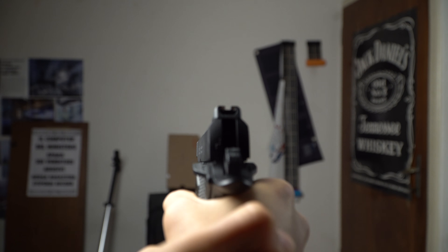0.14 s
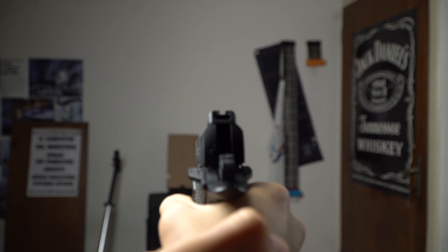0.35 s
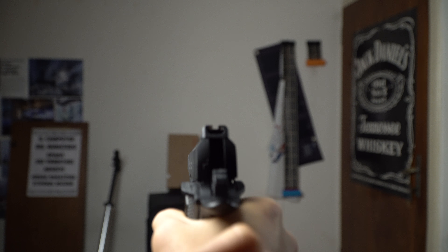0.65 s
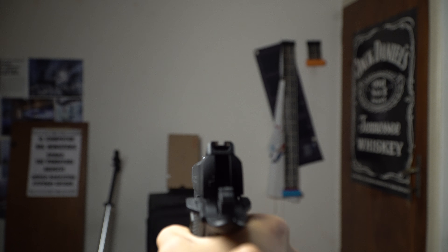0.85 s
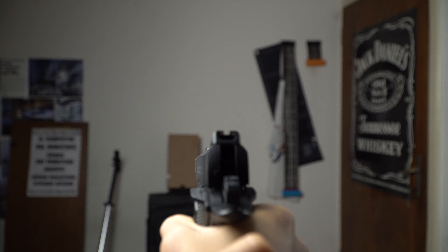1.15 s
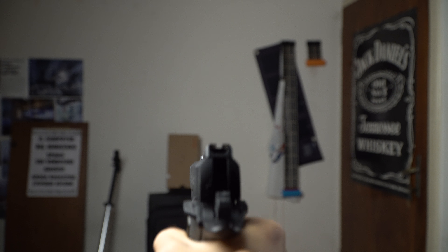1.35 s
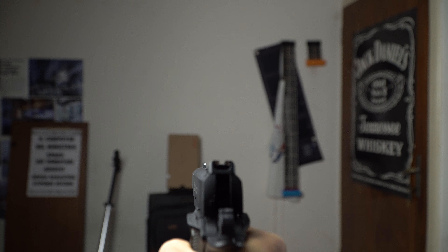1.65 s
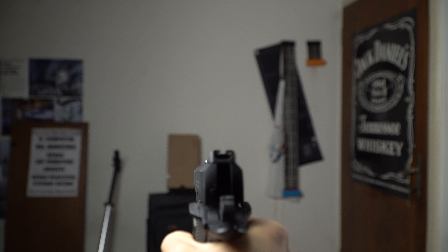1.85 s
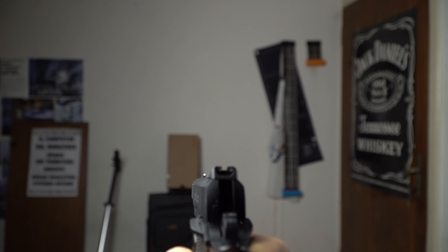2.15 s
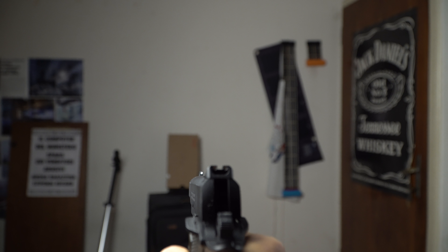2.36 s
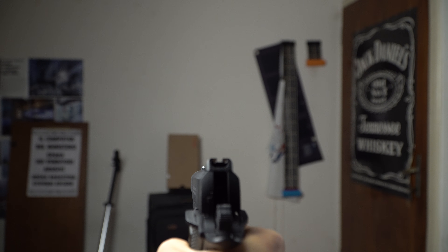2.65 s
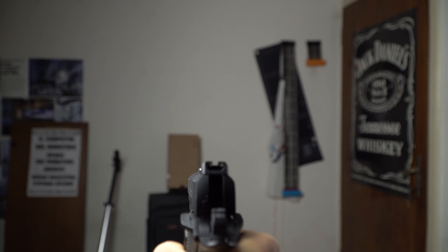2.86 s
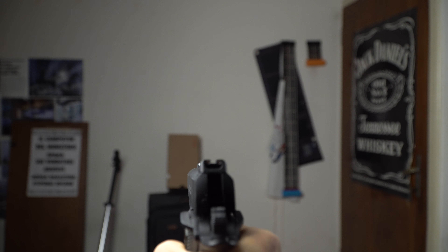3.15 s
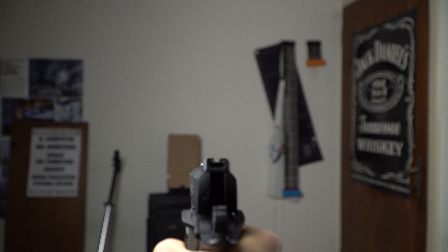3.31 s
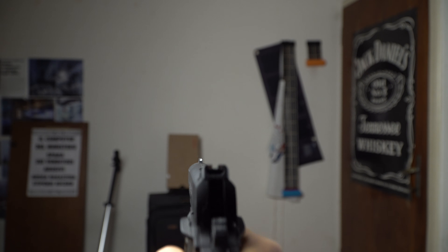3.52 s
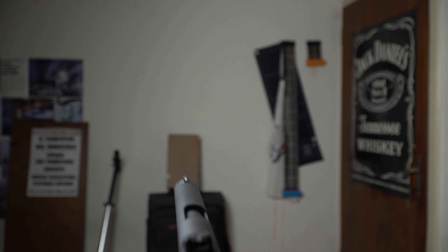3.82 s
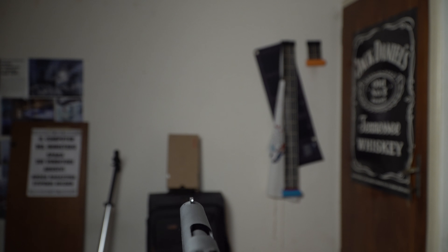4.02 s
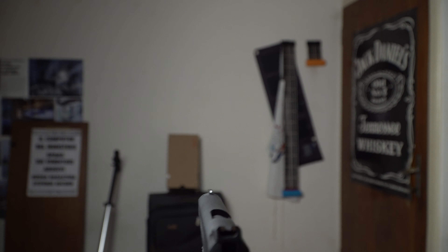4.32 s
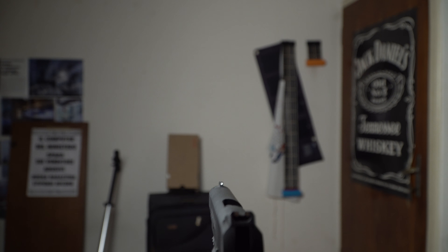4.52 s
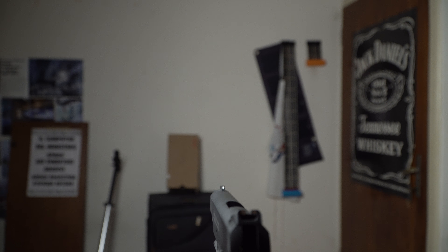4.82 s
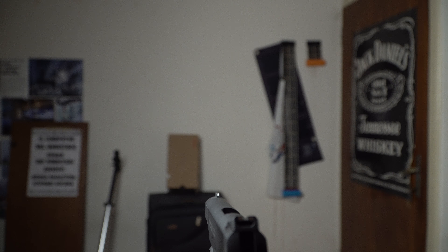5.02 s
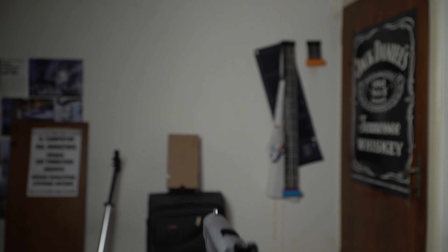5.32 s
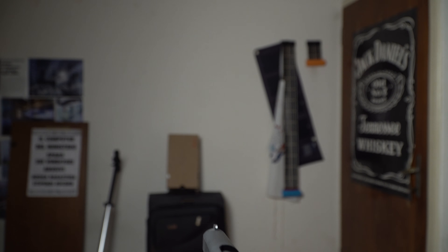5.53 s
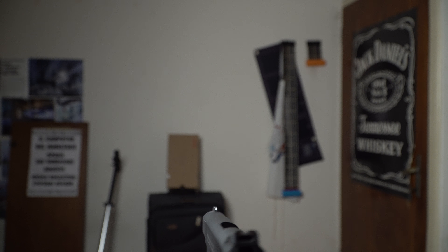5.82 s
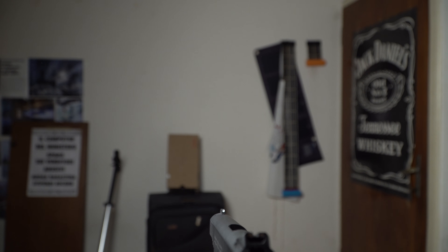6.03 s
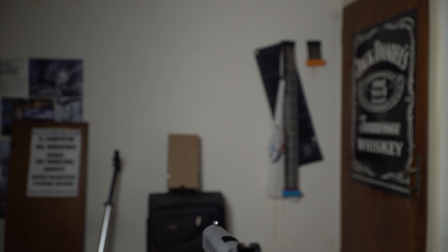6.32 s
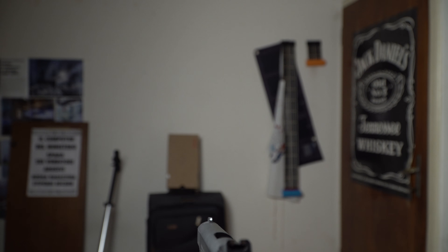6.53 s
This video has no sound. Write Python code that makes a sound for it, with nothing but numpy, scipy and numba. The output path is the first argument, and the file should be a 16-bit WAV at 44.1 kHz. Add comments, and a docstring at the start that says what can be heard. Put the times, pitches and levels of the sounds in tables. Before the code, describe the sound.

Faint hiss and low rumble fill a small bare room. At about 1.9 seconds a gas airsoft pistol fires close to the microphone: a loud, slightly clipped crack with a puff of gas and a metallic slide clack, ringing briefly in the room. A plastic pellet ricochets twice, then bounces to rest in quickening, fading ticks from 2.4 to 2.9 seconds. A second shot comes at 3.1 seconds, followed by three ricochet ticks. From 3.7 seconds the gun ticks faintly and a hand rubs softly on the microphone, ending in a dull bump and a tiny, faint falling finger squeak around 4.7 seconds. A light click at 5.4 seconds and a faint trigger click precede the third shot at 5.8 seconds, with one sharp ricochet and a weaker one. From 6.2 seconds a sleeve rustles softly, and the gun clicks twice around 6.4 seconds.

```python
"""A gas blowback airsoft pistol is fired three times close to a camera in a small bare room.
Over faint hiss a sleeve rustles and the trigger clicks. Each shot is a quick chain: hammer, gas blast,
slide back, gas vent, slide home. A limiter lets the first crack clip, then holds the reverberation level.
Pellets ricochet, the first bouncing to rest. After the second shot the gun ticks, a hand rubs and bumps
the camera and a finger squeaks on the grip; after the third the sleeve rustles and the gun clicks again."""
import sys
import numpy as np
from scipy import signal
from scipy.fft import rfft, irfft
from scipy.io import wavfile
from scipy.ndimage import uniform_filter1d
from numba import njit

SR = 44100
rng = np.random.default_rng(int(sys.argv[2]) if len(sys.argv) > 2 else 0)


def wrap_up_sound(samples):
    """Save the sound to the file named by the first command line argument, as 16-bit audio."""
    columns = np.atleast_2d(samples).T
    # keep every value between -1 and 1, then stretch to whole-number steps
    tamed = np.clip(columns, -1, 1)
    steps = np.round(tamed * 32767).astype(np.int16)
    wavfile.write(sys.argv[1], SR, steps)


N = 294110

# Noise spectra. Each row: frequency in Hz, relative spectral density in dB.
HISS_SPECTRUM = [(25, 13), (70, 11), (130, 7), (330, 1.5), (750, -1), (1150, -1.5), (1500, 1), (1750, -2),
                 (2000, -10), (2800, -14), (5500, -20), (8500, -22), (16000, -24)]  # room and microphone noise
SWAY_SPECTRUM = [(3, -23.5), (9, -5.5), (16, 10.5), (20, -6.5), (26, -21), (45, -36), (100, -68.5)]  # rumble of the hand-held camera
CLOTH_SPECTRUM = [(47, -24), (80, -5), (188, -3.5), (600, -13), (1080, -15.5), (1500, -23), (1720, -17.5),
                  (3030, -18), (4120, -16.5), (5720, -20.5), (8490, -40), (11300, -32), (15000, -47)]  # sleeve friction
CLICK_SPECTRUM = [(300, -26.5), (1200, 1), (2100, 5.5), (4200, 0.5), (8000, -10.5), (16000, -27)]  # small gun parts
BLAST_SPECTRUM = [(30, -25.5), (70, -15.5), (130, -8), (350, -1), (1000, -1.5), (2000, -1), (4500, 0.5),
                  (8000, -12), (12000, -12), (16000, -23.5)]  # blows and gas puffs of a shot
PELLET_SPECTRUM = [(60, -55), (300, -4), (1000, -7), (2500, 2), (4000, 1), (6000, -0.5), (8000, -10),
                   (12000, -10.5), (16000, -21.5)]  # plastic on a hard surface
RUB_SPECTRUM = [(40, -11.5), (200, 1.5), (500, -6.5), (1000, -9.5), (2000, -21), (3800, -19), (7000, -37),
                (16000, -75.5)]  # hand sliding on the camera
BUMP_SPECTRUM = [(30, -4), (70, -18), (230, 0.5), (500, -9), (1200, -23.5), (2600, -20.5), (3500, -33),
                 (5000, -60), (16000, -86)]  # hand striking the camera
# Mains hum and camera whine. Each row: frequency in Hz, rms level in dB.
HUM_TONES = [(50, -58), (1446, -70)]
# Arm movements. Each row: start, attack, hold and release in seconds, level in dB.
SLEEVE_MOVES = [(0.713, 0.018, 0.022, 0.22, -54.5), (6.205, 0.2, .02, 0.44, -41)]
# The room's decay. Each row: frequency in Hz, reverberation time T60 in seconds.
REVERB_TIMES = [(100, 1), (400, 0.59), (1200, 0.56), (3000, 0.52), (6000, 0.46), (10000, 0.36),
                (16000, 0.16)]
# The room's colour. Each row: frequency in Hz, gain in dB.
ROOM_GAINS = [(40, -15), (150, -22), (300, -4.5), (1000, 2.5), (2000, -1.5), (5000, -5.5), (8000, -2),
              (15000, -11)]
# Trigger pulls. Each row: shot time in seconds, shot gain in dB, relative slide ring and furniture ring
# in dB, lead of the trigger click in seconds, its level in dB.
SHOTS = [(1.8503, -5.5, -1, -2.5, .0742, -52.5), (3.1208, -5.5, -4, -1, .0384, -40.5),
         (5.8288, -6, 2, -2, .1029, -41)]
# One shot: sear, hammer, valve, muzzle blast, slide thrown back, slide stop, breech vent, slide home,
# barrel lock. Each row: delay in seconds, relative level in dB, T60 in seconds, tilt in dB per octave,
# relative steel ring in dB.
FIRING_CYCLE = [(-.0027, -4.5, 0.017, 3, -26.5), (0, -1.5, .02, 10, -16.5), (.0012, 12.5, 0.017, 9, -18),
                (.0028, 16, 0.037, 0, -30.5), (0.0107, 16, 0.046, .5, -24), (.016, 13.5, 0.08, 3.5, -29),
                (.037, 13, 0.092, -1.09, -30.5), (.0497, 17, 0.021, 5, -6), (.056, 15, 0.021, 2.5, -4.5)]
# Normal modes. Each row: frequency in Hz, relative level in dB, T60 in seconds.
SLIDE_MODES = [(2810, -8.5, .1), (4450, -3, 0.05), (6086, -4.5, 0.11), (6200, -4.5, .065),
               (6250, -6.5, 0.05), (9240, -10, 0.07), (9440, -10, 0.065), (11260, -5.5, .045),
               (13000, -13.5, .06), (14210, -18.5, 0.061)]  # the steel slide
FURNITURE_MODES = [(312, -12, .8), (399, -13, .9), (556, -26, 1.2), (627, -9, .65), (694, -21.5, 1.35),
                   (740, -14, .6), (842, -24, 1.4), (856, -6.5, .72), (1039, -26, 1.3), (1140, -7, .65),
                   (1231, -15, .85), (1282, -21, 1.3)]  # the room and the things in it
FLOOR_MODES = [(2290, -3, .2), (2960, -8, .2), (5400, -5, 0.18), (5640, -7, .22), (5940, -6, .2)]  # the floor under a pellet
# Brief contacts. Each row: start in seconds, level in dB, tilt in dB per octave.
RICOCHETS = [(2.054, -16, 9), (2.1906, -11, 3.5), (3.2998, -12.5, 10), (3.3793, -9.5, 2.5),
             (3.4951, -22, 5.5), (6.019, -7, 3.5), (6.2323, -25, 4)]  # pellets on walls and furniture
GUN_CLICKS = [(4.0296, -37.5, -0.5), (5.432, -40, 1.5), (6.384, -31, -1.5), (6.428, -31.5, 1)]  # the gun in the hand
# The hand shifts on the camera. One row: start, attack, hold and release in seconds, level in dB.
HAND_SHIFT = (3.74, .29, .57, .23, -46.8)
# The hand bumps the camera. Each row: start in seconds, level in dB, T60 in seconds, tilt in dB per octave.
CAMERA_BUMPS = [(4.6446, -15.5, 0.036, -2), (4.6469, -18.5, 0.013, 7), (4.6673, -23.5, 0.049, -3.5)]


def amp(db):
    """Amplitude ratio of a level in decibels."""
    return 10 ** (np.asarray(db) / 20)


def unit(x):
    """Normalisation to an rms of 1."""
    return x / np.sqrt(np.mean(x ** 2) + 1e-20)


def along(points, hz):
    """Interpolation of (Hz, value) points on a logarithmic frequency axis."""
    f, v = np.transpose(points)
    return np.interp(np.log(hz + 1), np.log(f), v)


def noise(spectrum, size, tilt_db=0):
    """Spectral shaping of white noise, tilted by tilt_db per octave, at an rms of 1."""
    hz = np.fft.rfftfreq(size, 1 / SR)
    gain = amp(along(spectrum, hz) + tilt_db * np.log2(hz + 1))
    return unit(irfft(rfft(rng.standard_normal(size)) * gain, size))


def fade(t60):
    """One second of exponential damping, 60 dB in t60 seconds."""
    return np.exp(-np.log(1000) * np.arange(SR) / SR / t60)


def onset(rise_s):
    """One second of smooth growth from 0 towards 1."""
    return 1 - np.exp(-(np.arange(SR) / SR / rise_s) ** 2)


def swell(start, attack, hold, release, db):
    """Trapezoidal envelope of one movement."""
    corners = start + np.cumsum([0, attack, hold, release])
    return amp(db) * np.interp(np.arange(N) / SR, corners, [0, 1, 1, 0])


def add(track, start, sound):
    """Superposition of a sound on a track, from start seconds."""
    part = track[max(round(start * SR), 0):][:len(sound)]
    part += sound[:len(part)]


def background():
    """Stationary noise floor: broadband hiss, two faint tones and the camera's very low rumble."""
    t = np.arange(N) / SR
    hum = sum(amp(db) * np.sqrt(2) * np.sin(2 * np.pi * hz * t) for hz, db in HUM_TONES)
    return amp(-56) * noise(HISS_SPECTRUM, N) + amp(-33.5) * noise(SWAY_SPECTRUM, N) + hum


def sleeve():
    """Friction in cloth radiates noise that follows the arm's movement."""
    return sum(swell(*move) for move in SLEEVE_MOVES) * noise(CLOTH_SPECTRUM, N)


def reverberation(sound, build_s):
    """A diffuse field builds up, then decays by absorption, fastest in the treble."""
    hz, t, bands = signal.stft(sound, SR, nperseg=256)
    decay = np.exp(-np.log(1000) * t / along(REVERB_TIMES, hz)[:, None])
    colour = amp(along(ROOM_GAINS, hz))[:, None]
    _, tail = signal.istft(bands * decay * colour, SR, nperseg=256)
    return tail[:SR] * onset(build_s)


def burst(spectrum, t60, tilt_db, wet_db, build_s, rise_s):
    """A transient is direct sound plus a reverberant field whose energy grows with its duration."""
    direct = noise(spectrum, SR, tilt_db) * fade(t60) * onset(rise_s)
    diffuse = reverberation(noise(spectrum, SR, tilt_db), build_s)
    return direct + amp(wet_db) * np.sqrt(t60) * diffuse


def gun_clicks():
    """Light impacts of small parts: the trigger before each shot, and the gun shifting in the hand."""
    out = np.zeros(N)
    triggers = [(start - lead, db, 1) for start, _, _, _, lead, db in SHOTS]
    lower_s, span_s, count = 3.77, .14, 4  # parts tick at random as the gun is lowered
    ticks = [(lower_s + span_s * (k + rng.random()) / count, -42.5 + 2 * rng.normal(), -3)
             for k in range(count)]
    for start, db, tilt_db in triggers + GUN_CLICKS + ticks:
        click = burst(CLICK_SPECTRUM, t60=.034, tilt_db=tilt_db, wet_db=1, build_s=.0072, rise_s=.0006)
        add(out, start, amp(db) * click)
    return out


def ring(modes):
    """Free vibration is a sum of damped modes; their strengths and phases vary from blow to blow."""
    t = np.arange(SR) / SR
    return sum(amp(db + 2 * rng.normal()) * fade(t60) * np.sin(2 * np.pi * (hz * t + rng.random()))
               for hz, db, t60 in modes)


def pistol():
    """Impulsive excitation: blows and gas puffs set the steel slide and the room ringing."""
    out = np.zeros(N)
    for start, shot_db, slide_db, furniture_db, _, _ in SHOTS:
        steel = np.zeros(N)
        for delay, db, t60, tilt_db, ring_db in FIRING_CYCLE:
            crack = burst(BLAST_SPECTRUM, t60, tilt_db, wet_db=6, build_s=.024, rise_s=.00082)
            add(out, start + delay, amp(shot_db + db) * crack)
            add(steel, start + delay, amp(shot_db + db + ring_db + slide_db - 5.5) * ring(SLIDE_MODES))
        room_response = reverberation(rng.standard_normal(SR), build_s=.023)
        room_response /= np.linalg.norm(room_response)
        out += steel + amp(-7.5) * signal.oaconvolve(steel, room_response)[:N]
        add(out, start, amp(shot_db + furniture_db) * ring(FURNITURE_MODES))
    return out


def pellet_impact(tilt_db):
    """A brief contact radiates a broad spectrum: hard plastic strikes a hard surface."""
    return burst(PELLET_SPECTRUM, t60=.026, tilt_db=tilt_db, wet_db=7.5, build_s=.00058, rise_s=.00089)


def ricochets():
    """Elastic rebound: pellets glance off walls and furniture."""
    out = np.zeros(N)
    for start, db, tilt_db in RICOCHETS:
        add(out, start, amp(db) * pellet_impact(tilt_db))
    return out


def bouncing_pellet():
    """Inelastic collisions shorten each flight by a fixed ratio; each weaker contact pings the floor."""
    out = np.zeros(N)
    landing_s, first_flight_s, restitution = 2.4025, .1475, .757
    landing_db, bounce_loss_db, relative_ping_db = -19, 5.4, -15
    for k in range(6):
        start = landing_s + first_flight_s * (1 - restitution ** k) / (1 - restitution)
        contact = pellet_impact(tilt_db=.6) + amp(relative_ping_db) * ring(FLOOR_MODES)
        add(out, start, amp(landing_db - bounce_loss_db * k) * contact)
    return out


def hand_on_camera():
    """Friction and impact at the microphone: a rub, then dull bumps in which direct sound dominates."""
    out = swell(*HAND_SHIFT) * noise(RUB_SPECTRUM, N)
    for start, db, t60, tilt_db in CAMERA_BUMPS:
        bump = burst(BUMP_SPECTRUM, t60, tilt_db, wet_db=-6, build_s=.0097, rise_s=.00053)
        add(out, start, amp(db) * bump)
    return out


def finger_squeak():
    """Stick-slip of skin on plastic: a thin, unsteady tone falls ever faster as the finger stops."""
    start_s, length_s, first_hz, last_hz = 4.684, .072, 5800, 3020
    progress = np.clip((np.arange(N) / SR - start_s) / length_s, 0, 1)
    glide = first_hz + (last_hz - first_hz) * progress ** 2.8
    jitter = unit(uniform_filter1d(rng.standard_normal(N), size=40))
    pitch = glide * (1 + .035 * jitter)
    envelope = 2 * np.sqrt(progress * (1 - progress))
    return amp(-57) * envelope * np.sin(2 * np.pi * np.cumsum(pitch) / SR)


def scene():
    """Linear superposition at one microphone, fed to both channels."""
    guns = gun_clicks() + pistol() + ricochets() + bouncing_pellet()
    return np.tile(background() + sleeve() + guns + hand_on_camera() + finger_squeak(), (2, 1))


@njit
def gain_reduction(excess_db, attack, release):
    """Envelope following: attenuation in dB chases any excess quickly and recovers at a steady rate."""
    out = np.zeros(len(excess_db))
    held_db = 0.0
    for i in range(len(excess_db)):
        if excess_db[i] > held_db:
            held_db += (excess_db[i] - held_db) * attack
        else:
            held_db = max(held_db - release, 0.0)
        out[i] = held_db
    return out


def record(dry):
    """Limiting with a finite attack: the first crack clips, the decay is levelled; a low-pass follows."""
    ceiling_db, attack_s, recovery_db_per_s, cutoff_hz = -6, .0008, 125, 15850
    excess_db = 20 * np.log10(np.abs(dry[0]) + 1e-9) - ceiling_db
    limited = dry * amp(-gain_reduction(excess_db, 1 / (attack_s * SR), recovery_db_per_s / SR))
    clipped = np.clip(limited, -1, 1)
    return signal.sosfiltfilt(signal.butter(24, cutoff_hz, fs=SR, output="sos"), clipped)


dry = scene()
out = record(dry)
wrap_up_sound(out)
```